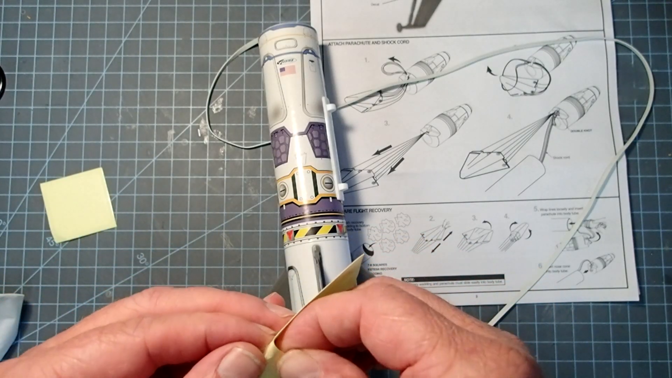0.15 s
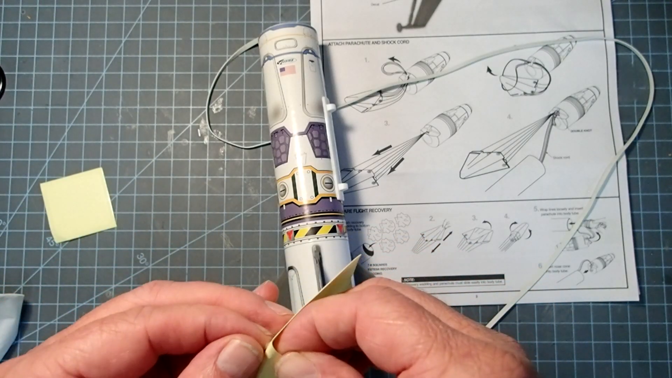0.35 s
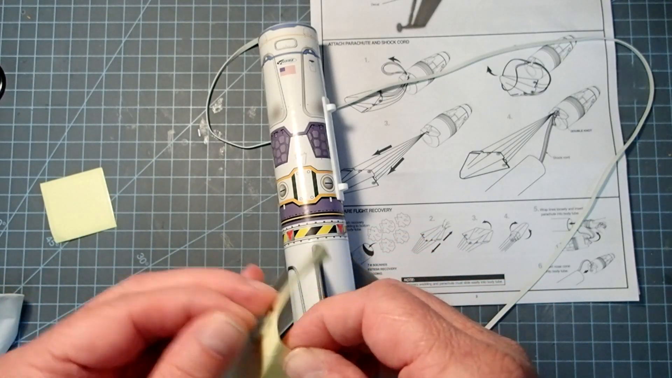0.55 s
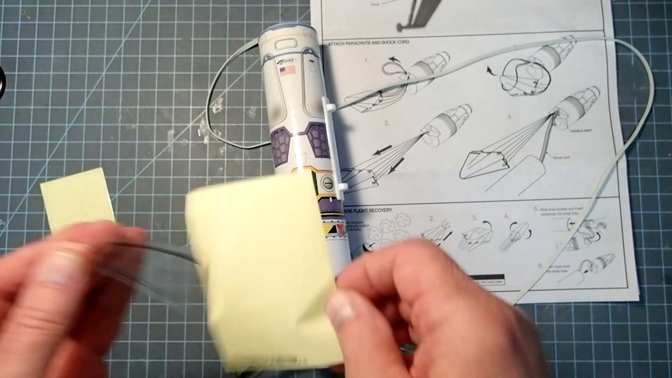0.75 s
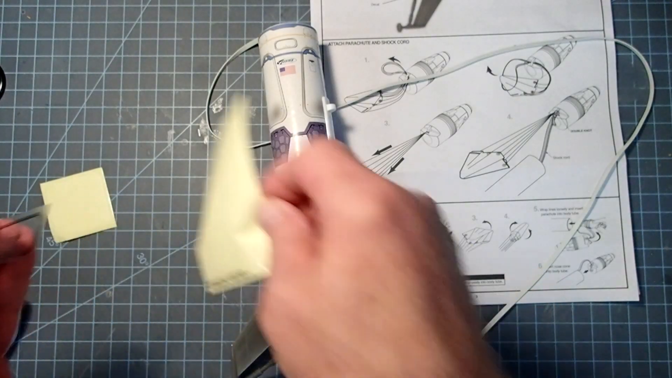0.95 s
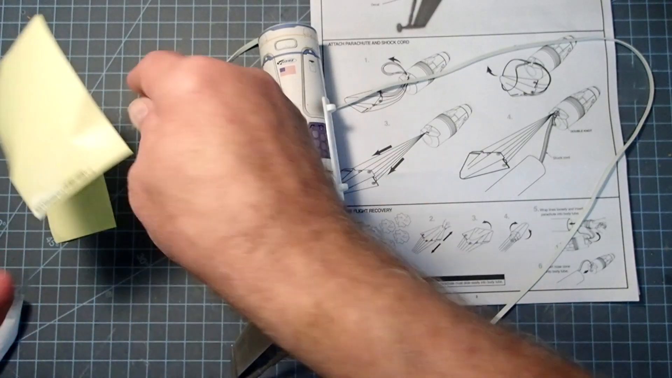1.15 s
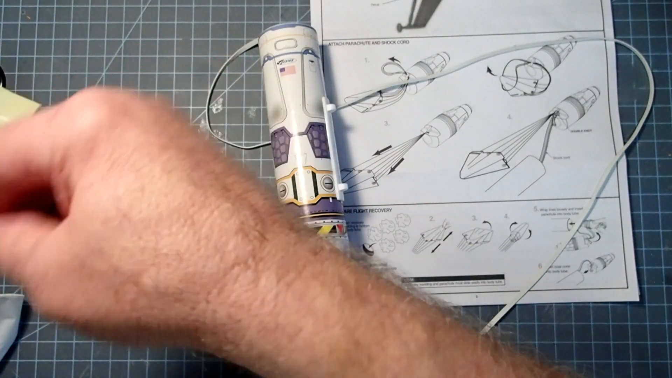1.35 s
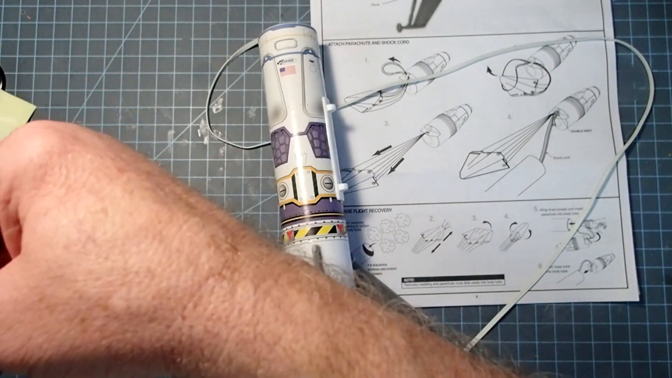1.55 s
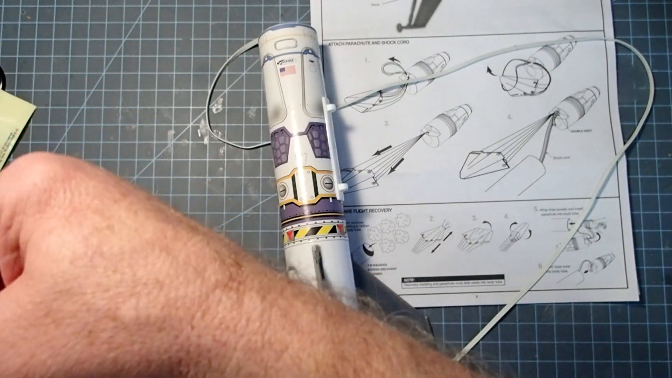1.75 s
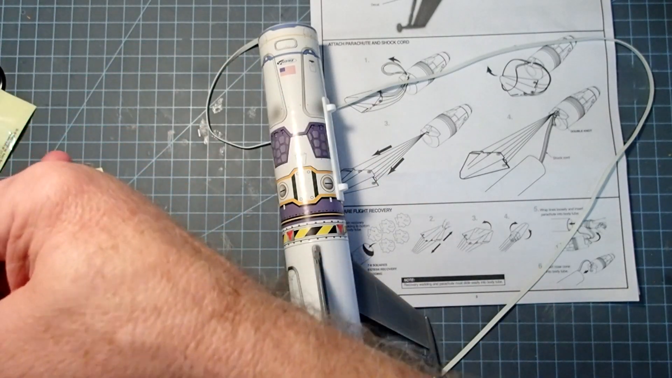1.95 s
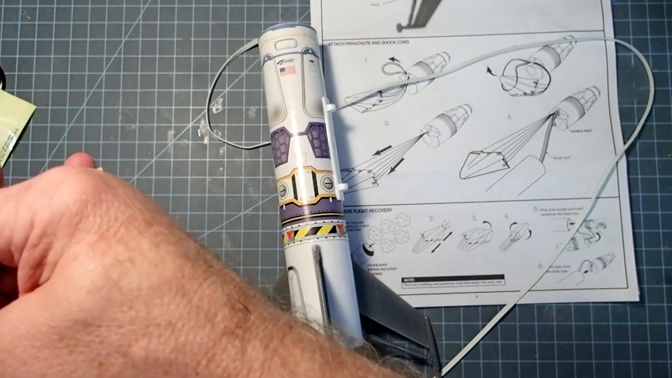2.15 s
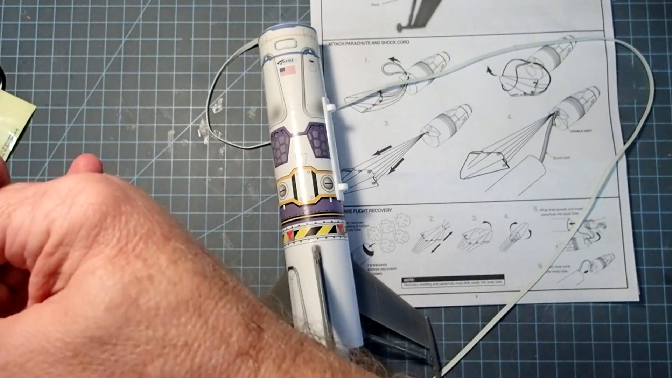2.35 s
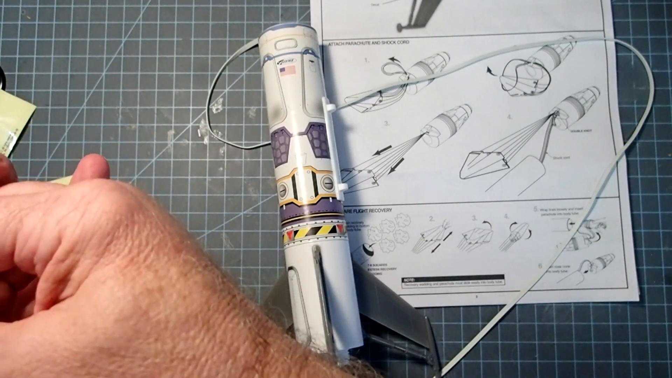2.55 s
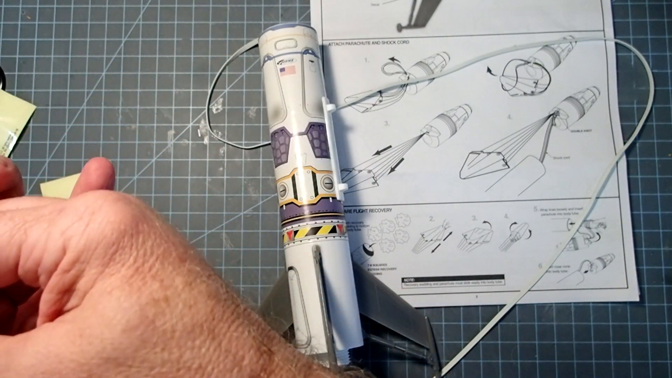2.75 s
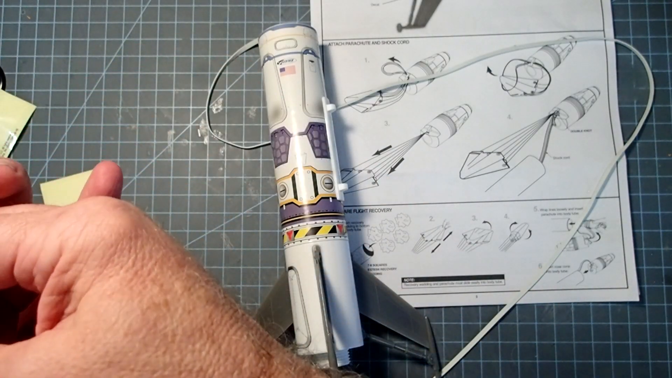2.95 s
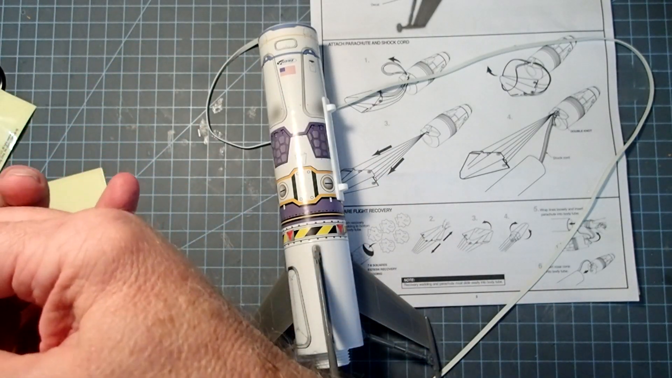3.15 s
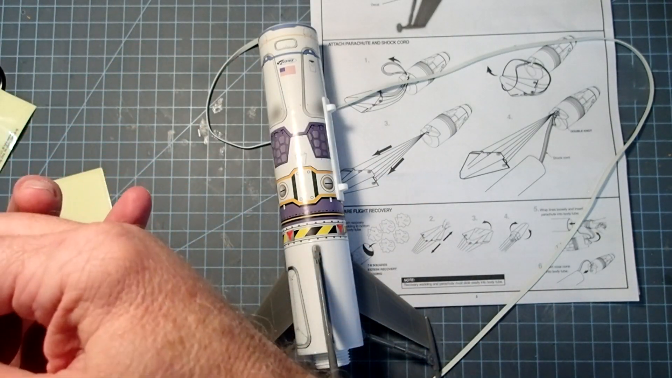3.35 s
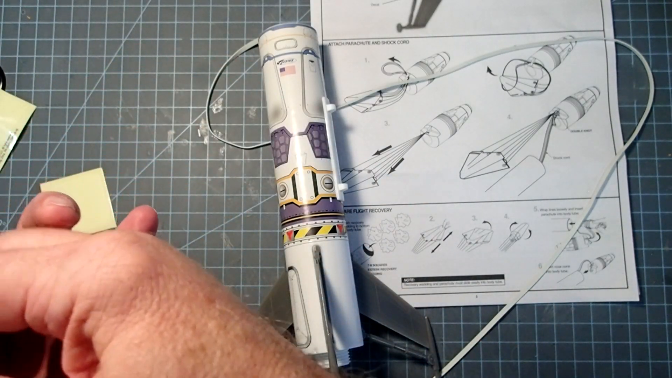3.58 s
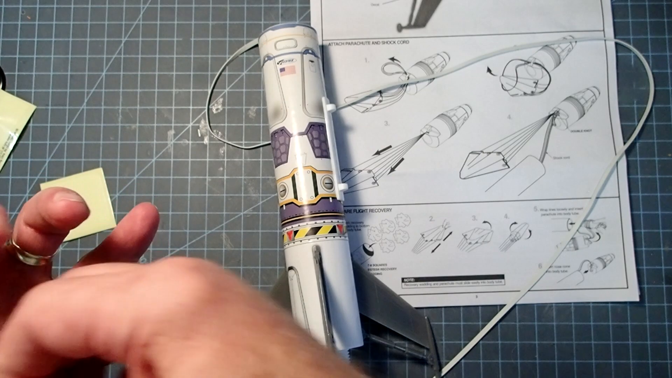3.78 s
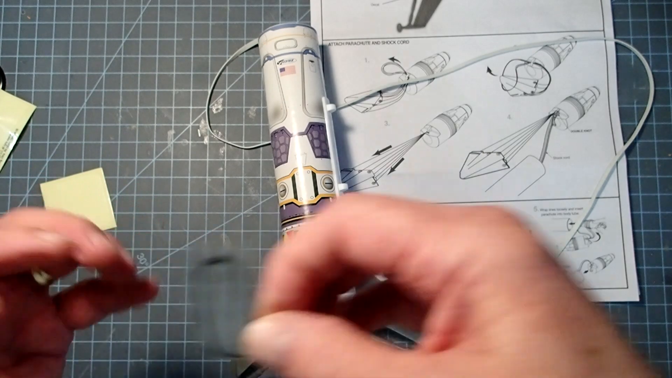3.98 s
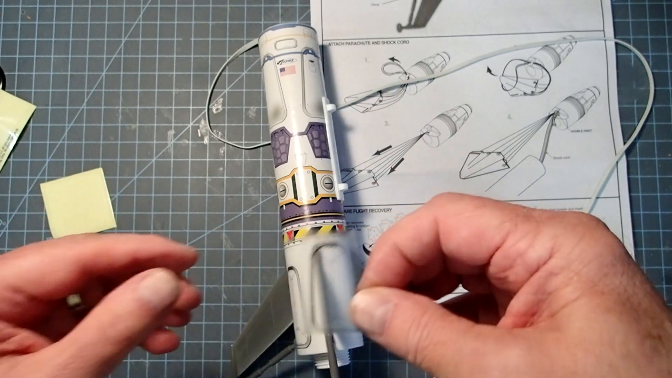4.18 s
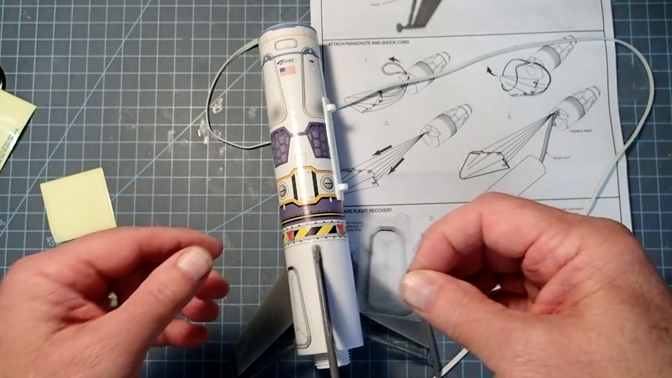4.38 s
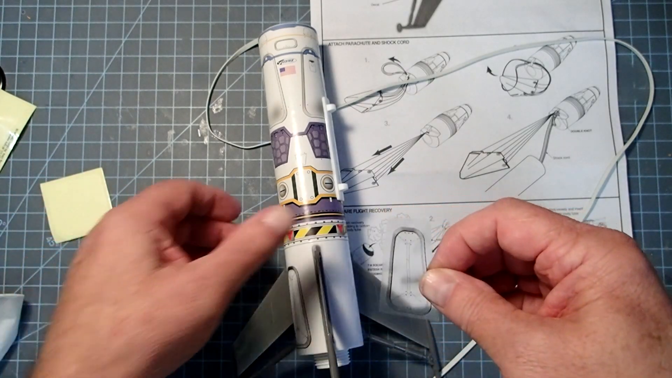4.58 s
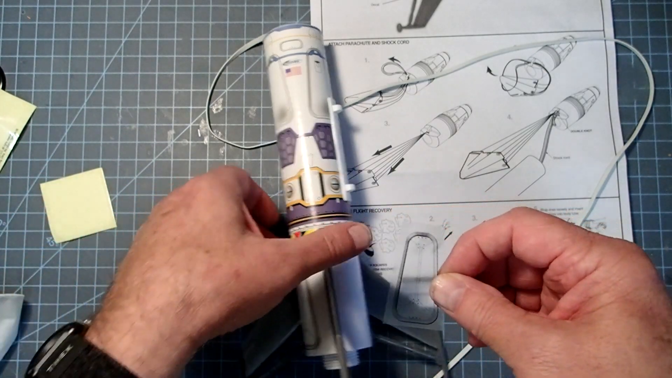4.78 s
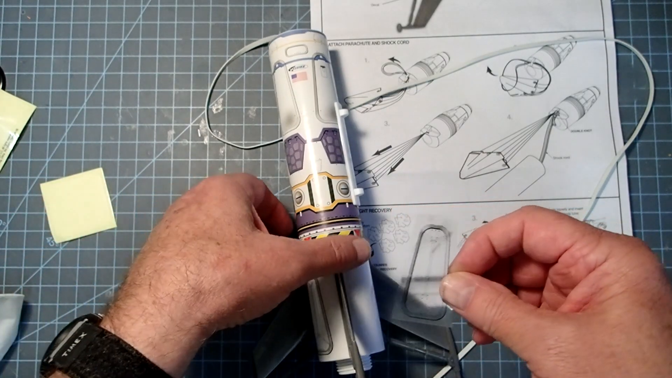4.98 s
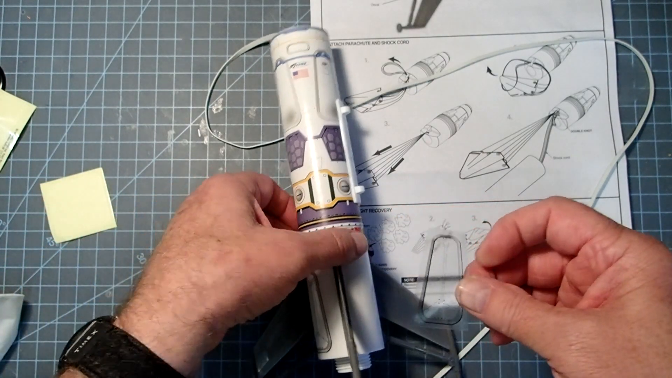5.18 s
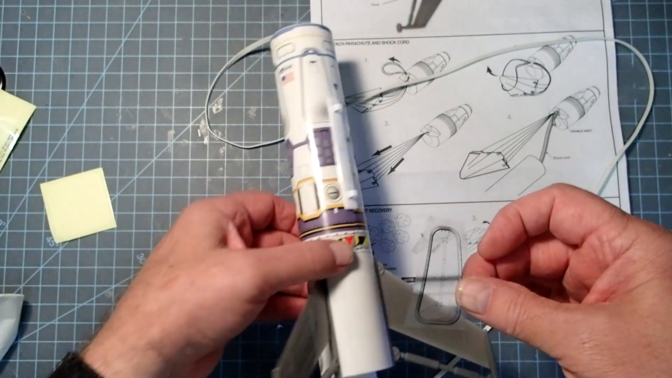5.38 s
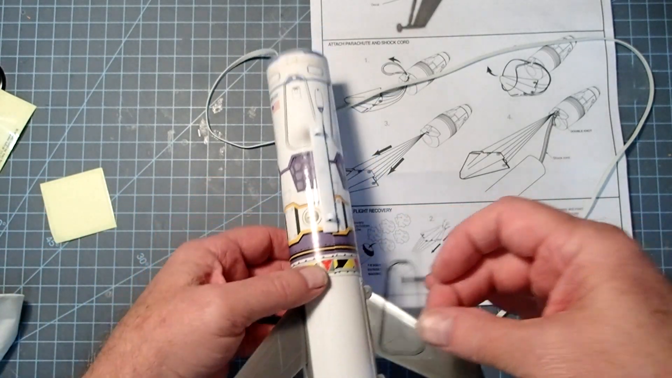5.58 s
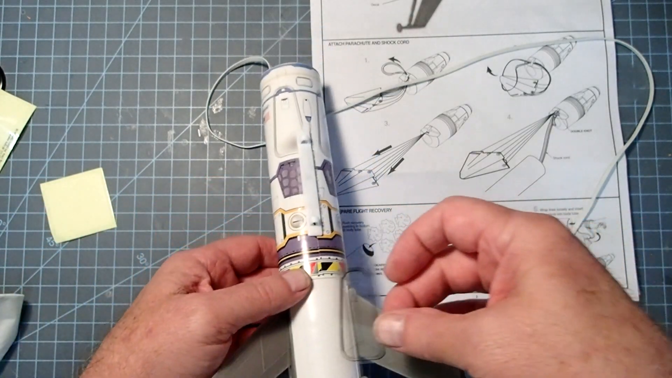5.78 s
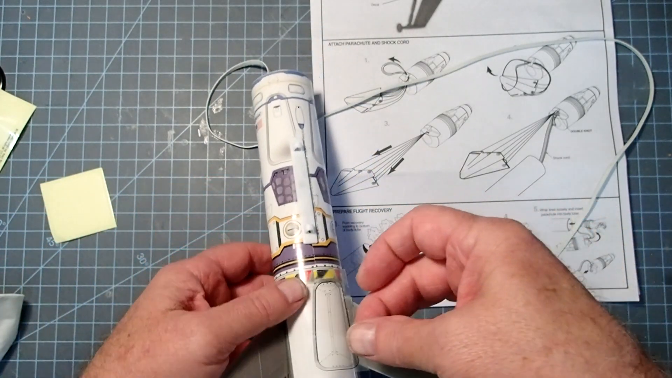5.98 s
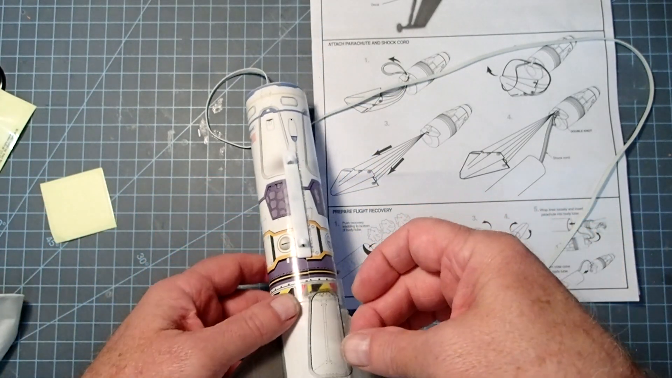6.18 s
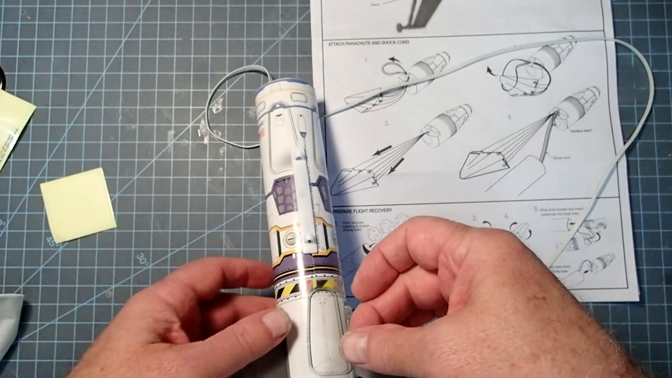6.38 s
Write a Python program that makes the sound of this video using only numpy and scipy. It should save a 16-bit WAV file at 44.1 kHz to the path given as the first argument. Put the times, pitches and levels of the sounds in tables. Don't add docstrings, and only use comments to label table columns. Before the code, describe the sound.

Bright paper crackles over a faint appliance hum, a quiet gap, a sharp film pop, then hollow scrapes of a cardboard tube.

```python
import sys
import numpy as np
from scipy import signal
from scipy.fft import rfft, irfft, next_fast_len
from scipy.io import wavfile
from scipy.ndimage import uniform_filter1d

SR = 44100
rng = np.random.default_rng(int(sys.argv[2]) if len(sys.argv) > 2 else 0)


def generate_wav(sig):
    pcm = np.round(np.clip(np.atleast_2d(sig).T, -1, 1) * 32767).astype(np.int16)
    wavfile.write(sys.argv[1], SR, pcm)


def voltage_ratio(level):
    return 10 ** (np.asarray(level, float) / 20)


N = 283563

# frequency in Hz, level in dB per Hz.
AIR = [(20, -48), (40, -17.5), (70, -14), (120, -10), (200, -8.5), (300, -8.5), (430, -9), (720, -15.5),
       (900, -9.5), (1450, -17), (1900, -21.5), (2300, -35), (2700, -44), (4000, -79.5)]
# frequency in Hz, likeness from 0 to 1.
AIR_ALIKE = [(60, 0.82), (300, 0.82), (700, 0.59), (1400, 0.41), (3000, 0.15)]
# frequency in Hz, half width in Hz, level in dB over the air.
HUM = [(124, 3.7, 4.5), (168.4, 3.3, -0.5), (213, 5, 2.5), (258.5, 5, 2), (320.5, 4.6, 0.5),
       (362.5, 4.7, 2), (421.3, 12, 1.5), (558.4, 4.2, 6.5), (808, 3, 7)]
MAINS_HZ, MAINS_DB = 359.6, -6.5
# frequency in Hz, level in dB per Hz.
HISS = [(1800, -38.5), (2300, -22.5), (2700, -24), (3500, -18), (4400, -21), (4800, -11.5), (6400, -1),
        (7400, -4.5), (8800, 1), (9400, -0.5), (10500, -11.5), (15500, -11.5), (16300, -23)]
HISS_DB, HISS_FOLLOWS = -58.5, 0.86
SHUT_DB, GATE_OPENS_DB, GATE_RANGE_DB, GATE_SLOPE = -58.5, -65, 30, 0.46
GATE_QUICK_S, GATE_SLOW_S, GATE_LEAD_S, GATE_WANDER_DB = 0.011, 0.07, 0.01, 0.83
GATE_BASS_HZ, GATE_BASS_DB = 2500, -12

# time in seconds, crack level in dB,
# brightest frequency in Hz, body thud level in dB, thud frequency in Hz.
CRACKS = [(.5626, -60, 8500, -63, 920), (.5761, -39, 8050, -59, 1080), (.5945, -25, 6900, -53, 1460),
          (.6084, -26.5, 6330, -48, 1500), (.6264, -33, 6980, -52, 1660), (.6364, -31, 5050, -47, 950),
          (.7068, -12, 5600, -35, 1330), (.7432, -39, 6500, -57, 980), (.7617, -35, 6000, -48, 1160),
          (.7934, -23, 8200, -38, 1440), (.7981, -20, 6550, -45, 1760), (.8044, -22, 5860, -39, 1600),
          (.8124, -27, 6800, -36.5, 1440), (.8274, -24, 6600, -31.5, 1400), (.8754, -37, 6360, -47, 1800),
          (1.1473, -34, 7060, -52, 930), (1.2461, -45, 6600, -65, 910), (1.3478, -24, 5500, -31.5, 1390),
          (1.3716, -16, 4600, -17.5, 1330), (1.3838, -23.5, 5600, -25, 1500),
          (1.3984, -24, 6260, -39, 1560), (1.4077, -31, 5740, -35, 1100), (1.4424, -44, 6290, -41, 990),
          (1.4904, -48.5, 8780, -49.5, 1030)]
# time in seconds, crack in dB, brightest Hz, thud in dB, thud Hz.
TEARS = [(.8353, -15.5, 6400, -38, 1580), (.8404, -23.5, 6470, -41, 1690), (1.1524, -44, 6910, -60, 960),
         (1.3064, -47, 6070, -49, 1020), (1.4151, -32, 5950, -34.5, 1080), (3.1443, -42.5, 6760, -60, 930),
         (3.2443, -40.5, 6970, -64, 1240), (3.3009, -38, 7050, -49, 930), (3.3454, -9.5, 6840, -31, 1650),
         (3.4004, -33, 5430, -41, 1730), (4.8509, -49, 5000, -40, 1340), (5.1572, -24.5, 5600, -37, 1690),
         (5.563, -41, 5000, -38, 1300), (5.583, -36.5, 4700, -35, 1250), (5.6029, -52, 6840, -37.5, 1120)]
# time in seconds, crack in dB, brightest Hz, thud in dB, thud Hz.
TICKS = [(2.7841, -37, 8500, -52, 900), (3.2231, -47, 6980, -65, 900), (3.3524, -18, 5990, -39, 1770),
         (3.5254, -40, 6500, -49, 1010), (3.5473, -41.5, 6250, -58.5, 1110), (4.59, -39, 4300, -47, 1700),
         (5.1064, -59, 9170, -46, 980), (5.2144, -44.5, 4300, -47.5, 1510),
         (5.6534, -44, 6720, -32.5, 1130), (5.6634, -48, 6770, -36, 1050),
         (5.7638, -36.5, 6240, -33.5, 1130)]
# time in seconds, crack in dB, brightest Hz, thud in dB, thud Hz.
SNAP = [
    (3.6885, -15.5, 7800, -41, 1800),
    (3.673, -40, 8020, -54.5, 1600),
]
CRACK_RISE_S, TEAR_RISE_S, SNAP_RISE_S = 0.0006, 0.0045, 0.0003
CRACK_T60_S, TICK_T60_S, TEAR_T60_S, SNAP_T60_S = 0.032, 0.032, 0.03, 0.036
T60_DB_PER_DB = 0.25
# peak in seconds, rise in seconds, fall in seconds,
# rustle level in dB, low rustle level in dB.
HANDS = [(.618, 0.071, 0.45, -46, -56.5), (.8, 0.17, 0.18, -44, -52), (1.14, 0.088, 0.18, -57.5, -58),
         (1.36, 0.14, 0.21, -52, -50), (1.47, .2, 0.1, -57, -62), (2.79, .06, 0.22, -59.5, -62),
         (3.25, 0.48, 0.073, -62.5, -68.5), (3.349, 0.055, .11, -36.5, -50),
         (3.63, 0.59, 0.082, -63, -67.5), (3.75, 0.16, 0.17, -53.5, -58.5), (4.876, .25, 0.38, -63, -75),
         (5.17, 0.27, 0.35, -63, -53.5), (5.48, 0.4, 0.13, -64, -50.5), (5.58, 0.057, 0.4, -52, -54),
         (5.78, 0.043, 0.66, -59, -62.5), (6.1, 0.46, 0.71, -63, -63.5)]
SWELL_DB, HANDS_PAN_DB = 21.5, -4
# frequency in Hz, level in dB per Hz.
PAPER = [(1290, -34.5), (2200, -17.5), (3360, -21.5), (3970, -13), (4720, -6), (5260, -2.5), (6470, 0),
         (7520, -3), (8870, 0), (10100, -13.5), (14700, -14.5), (16000, -40)]
# time in seconds, level in dB.
FULLNESS = [(.72, -7), (.85, 0.5), (1.2, -30), (1.36, 9), (3.1, -25), (3.36, -16.5), (3.42, -9.5),
            (4.6, 4.5), (5.16, 6.5), (5.65, 3.5), (5.76, -19)]

ROOM_T60_S, ROOM_DB, ROOM_DELAY_S = 0.22, -13.5, 0.017
RIGHT_LAG_S = 0.00001

POP_S = 3.68752
# frequency in Hz, level in dB, t60 in seconds.
POP = [(1700, -15.5, 0.0084), (3260, -22, 0.0041), (4500, -20.5, .003), (5670, 0, 0.0033),
       (6200, 4.5, 0.0024), (7500, -15, 0.0014), (8550, 2, 0.0032), (11340, -19, 0.00221),
       (14000, -15, 0.0018)]

# peak in seconds, rise in seconds,
# fall in seconds, scrape level in dB, ringing frequency in Hz.
ROLL = [
    (4.87, 0.087, 0.14, -47, 1310),
    (5.155, 0.073, 0.13, -44, 1300),
    (5.25, 0.14, .15, -51.5, 1310),
    (5.338, .09, .14, -44, 1135),
    (5.462, .12, .08, -40.5, 1170),
    (5.594, 0.081, 0.14, -37.5, 1200),
    (5.66, .07, .05, -31, 1040),
    (5.885, .045, .08, -42, 1100),
]
# frequency in Hz, level in dB per Hz.
TUBE = [(410, -55), (700, -24.5), (908, -8.5), (1050, -2.5), (1120, -3.5), (1420, -7), (1860, -5.5),
        (1960, -13), (2410, -31.5), (3180, -36.5), (3630, -33), (4220, -33.5), (4600, -31.5), (5980, -60.5),
        (10100, -120)]
LOW_WALL_HZ, HIGH_WALL_HZ, WALL_WIDTH_HZ = 1100, 1350, 300

TOP_HZ = 15950


def on_log_hz(points, size):
    hz, value = np.transpose(points)
    bins_hz = np.arange(size // 2 + 1) * SR / size
    return np.interp(np.log(bins_hz + 1), np.log(hz), value)


def colour(x, points):
    cepstrum = irfft(np.log(voltage_ratio(on_log_hz(points, size=2048))))
    cepstrum[1:1024] *= 2
    cepstrum[1025:] = 0
    response = irfft(np.exp(rfft(cepstrum)))[:1024]
    response = response / np.linalg.norm(response)
    return signal.fftconvolve(x, response[None], axes=1)[:, :N]


def ring(x, hz, width_hz):
    return signal.lfilter(*signal.iirpeak(hz, hz / width_hz, fs=SR), x)


def unit(x):
    return x / np.sqrt(np.mean(x ** 2))


def smooth(x, seconds):
    size = max(int(seconds * SR), 1)
    return uniform_filter1d(uniform_filter1d(x, size), size)


def decay(t, t60):
    return np.exp(-np.log(1000) * t / t60)


def ports(shared, own, alike):
    alike = np.clip(alike, 0, 1)
    opposed = own * np.array([[1], [-1]])
    return np.sqrt((1 + alike) / 2) * shared + np.sqrt((1 - alike) / 2) * opposed


def grit(size, scatter_db, alike, hold_s):
    hold = max(int(hold_s * SR), 1)
    jumps_db = scatter_db * rng.exponential(size=size // hold + 1).clip(0, 3.5)
    grains = np.repeat(voltage_ratio(jumps_db), hold)[:size]
    return unit(grains * ports(rng.standard_normal(size), rng.standard_normal(size), alike))


def swells(peak_s, rise_s, fall_s, peak_db):
    dt = np.arange(N) / SR - peak_s[:, None]
    away = np.maximum(-dt / rise_s[:, None], dt / fall_s[:, None])
    return voltage_ratio(peak_db[:, None] - SWELL_DB * away)


def gate(near):
    bass = signal.lfilter(*signal.butter(2, GATE_BASS_HZ, fs=SR), near)
    heard = near - bass + voltage_ratio(GATE_BASS_DB) * bass
    power = smooth((heard ** 2).mean(0), GATE_QUICK_S)
    near_db = 10 * np.log10(power.clip(1e-12))
    lift = smooth(np.clip(near_db - GATE_OPENS_DB, 0, GATE_RANGE_DB), GATE_SLOW_S / 2)
    lift = np.roll(lift, -int(GATE_LEAD_S * SR))
    wander = GATE_WANDER_DB * unit(smooth(rng.standard_normal(N), 0.053))
    return SHUT_DB - 0.6 + GATE_SLOPE * lift + wander


def background(near):
    size = next_fast_len(N)
    shared, own = rfft(rng.standard_normal((2, size)))
    f = np.arange(len(own)) * SR / size
    hum = sum(voltage_ratio(db) / (1 + ((f - hz) / width) ** 2) for hz, width, db in HUM)
    shape = voltage_ratio(on_log_hz(AIR, size)) * (1 + hum)
    spectrum = shape * ports(shared, own, on_log_hz(AIR_ALIKE, size))
    air = unit(irfft(spectrum, size)[:, :N])
    air = air + voltage_ratio(MAINS_DB) * np.sin(2 * np.pi * MAINS_HZ * np.arange(N) / SR)
    hiss = colour(rng.standard_normal((2, N)), HISS)
    gate_db = gate(near)
    hiss_db = HISS_DB + HISS_FOLLOWS * (gate_db - SHUT_DB)
    return voltage_ratio(gate_db + 2.5) * air + voltage_ratio(hiss_db) * hiss


def buckles(table, rise_s, t60):
    sharp, thuds = np.zeros((2, N)), np.zeros((2, N))
    t = np.arange(3000) / SR
    for s, crack_db, bright_hz, thud_db, thud_hz in table:
        at = int((s - rise_s / 2) * SR)
        lasts = t60 * voltage_ratio(-T60_DB_PER_DB * (crack_db + 23))
        fade = decay(np.maximum(t - rise_s, 0), lasts) * np.minimum(t / rise_s, 1) ** 2
        burst = fade * grit(len(t), 2.8, alike=0.52, hold_s=0.00026)
        burst += 1.6 * ring(burst, bright_hz, 1200)
        sharp[:, at:at + len(t)] += voltage_ratio(crack_db - 6.5) * unit(burst) * fade.std()
        push = fade * grit(len(t), 1.77, alike=1.0, hold_s=0.0004)
        thud = ring(ring(push, thud_hz, 470), thud_hz, 710)
        thuds[:, at:at + len(t)] += voltage_ratio(thud_db + 1.0) * unit(thud) * fade.std()
    return sharp, thuds


def paper():
    peak_s, rise_s, fall_s, rustle_db, low_db = np.transpose(HANDS)
    rustle = swells(peak_s, rise_s, fall_s, rustle_db).max(0)
    low_rustle = swells(peak_s, rise_s, fall_s, low_db).max(0)
    treble = rustle * grit(N, 3.3, alike=0.25, hold_s=0.00075)
    body = low_rustle * colour(grit(N, 2.75, alike=0.34, hold_s=0.002), TUBE)
    for table, rise_s, t60 in [(CRACKS, CRACK_RISE_S, CRACK_T60_S), (TICKS, CRACK_RISE_S, TICK_T60_S),
                               (TEARS, TEAR_RISE_S, TEAR_T60_S), (SNAP, SNAP_RISE_S, SNAP_T60_S)]:
        sharp, thuds = buckles(table, rise_s, t60)
        treble, body = treble + sharp, body + thuds
    free_s, free_db = np.transpose(FULLNESS)
    fullness = voltage_ratio(np.interp(np.arange(N) / SR, free_s, free_db))
    treble = treble + fullness * ring(treble, 3300, 2000)
    sides = voltage_ratio(np.array([[1], [-1]]) * HANDS_PAN_DB / 2)
    return colour(sides * treble, PAPER) + body


def room(x):
    t = np.arange(int(0.4 * SR)) / SR
    onset = np.minimum(t / ROOM_DELAY_S, 1) ** 2
    tail = rng.standard_normal((2, len(t))) * decay(t, ROOM_T60_S) * onset
    tail /= np.linalg.norm(tail, axis=1, keepdims=True)
    return voltage_ratio(ROOM_DB) * signal.fftconvolve(x.mean(0)[None], tail, axes=1)[:, :N]


def pop():
    out, t = np.zeros((2, N)), np.arange(600) / SR
    far = np.array([[0], [1]])
    level, detune = voltage_ratio(1.3 * far), 1 - 0.03 * far
    rings = sum(voltage_ratio(db) * level * decay(t, t60) * np.sin(2 * np.pi * hz * detune * t) for hz, db, t60 in POP)
    at = int(POP_S * SR)
    out[:, at:at + len(t)] = rings * np.minimum(t / 0.00032, 1)
    return out


def tube():
    peak_s, rise_s, fall_s, scrape_db, ring_hz = np.transpose(ROLL)
    strokes = swells(peak_s, rise_s, fall_s, scrape_db)
    wall = colour(grit(N, 1.6, alike=1.0, hold_s=0.003), TUBE)
    now_hz = ring_hz[strokes.argmax(0)]
    upper = np.clip((now_hz - LOW_WALL_HZ) / (HIGH_WALL_HZ - LOW_WALL_HZ), 0, 1)
    upper = smooth(upper, 0.01)
    low_ring = ring(wall, LOW_WALL_HZ, WALL_WIDTH_HZ)
    high_ring = ring(wall, HIGH_WALL_HZ, WALL_WIDTH_HZ)
    grip = (1 - upper) * low_ring + upper * high_ring
    return voltage_ratio(-0.5) * strokes.max(0) * unit(wall + 1.8 * grip)


def scene():
    rubbing = paper() + tube()
    near = rubbing + pop()
    size = next_fast_len(N)
    f = np.arange(size // 2 + 1) * SR / size
    lag = np.exp(-2j * np.pi * f * RIGHT_LAG_S)
    right = irfft(rfft(near[1], size) * lag, size)[:N]
    direct = np.array([near[0], right])
    return direct + room(near) + background(rubbing)


def top_cut(x):
    return signal.sosfilt(signal.butter(12, 16300, fs=SR, output="sos"), x)


def record(dry):
    low_pass = signal.ellip(8, 0.2, 50, TOP_HZ, fs=SR, output="sos")
    mix = np.clip(signal.sosfilt(low_pass, dry), -1, 1)
    return top_cut(mix)


dry = scene()
out = record(dry)
generate_wav(out)
```